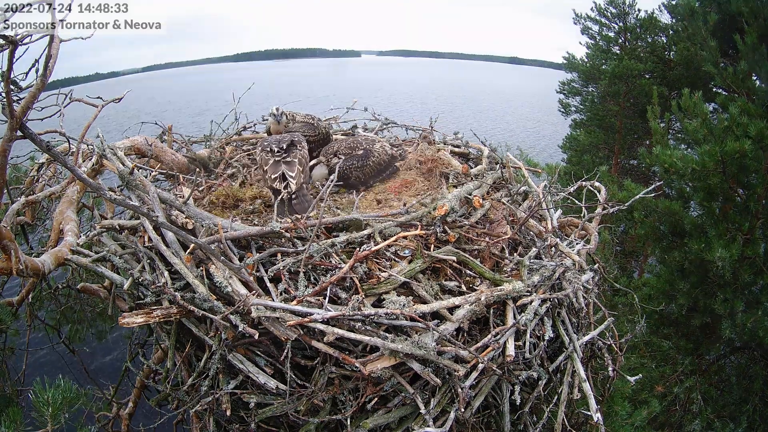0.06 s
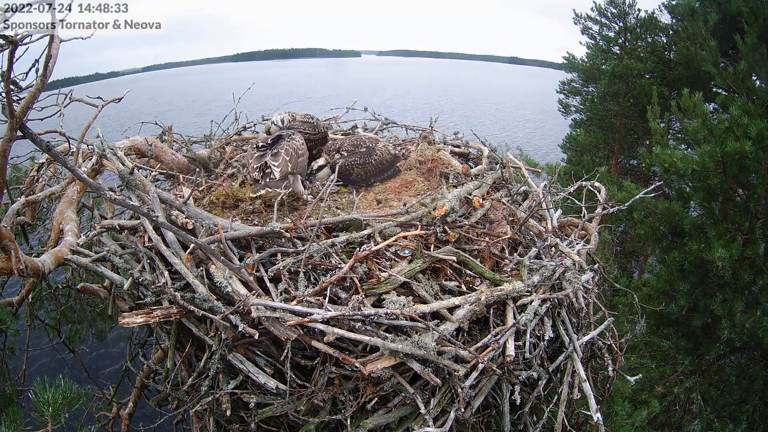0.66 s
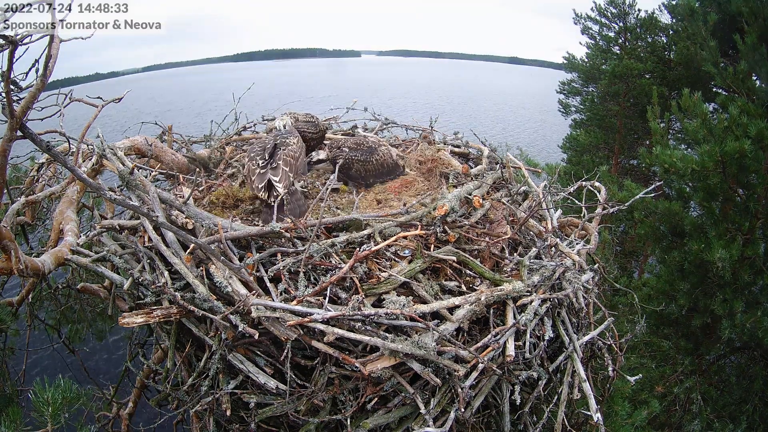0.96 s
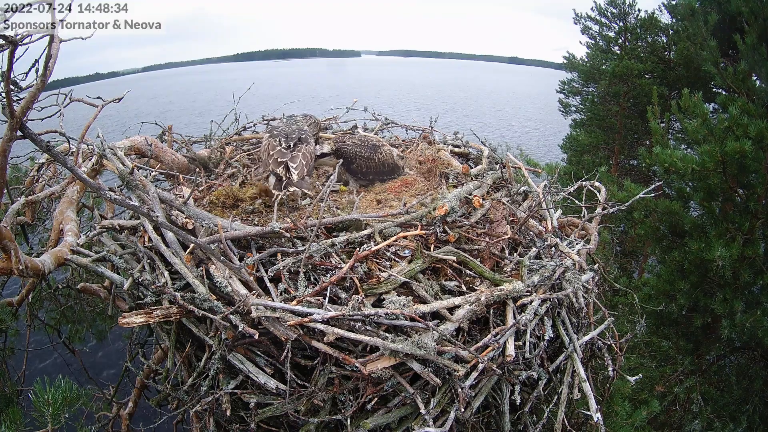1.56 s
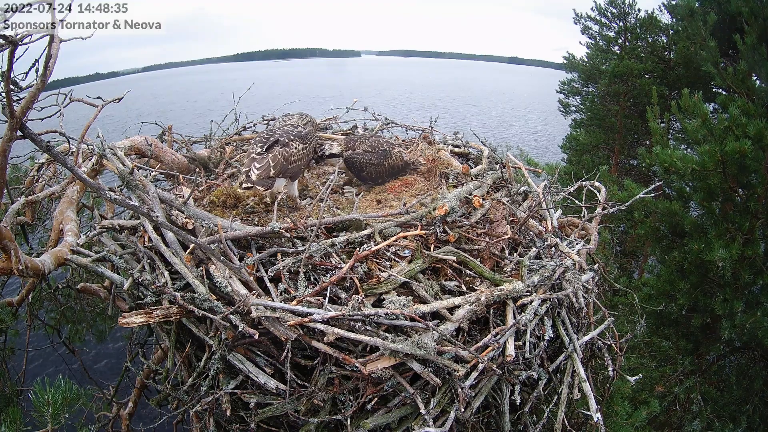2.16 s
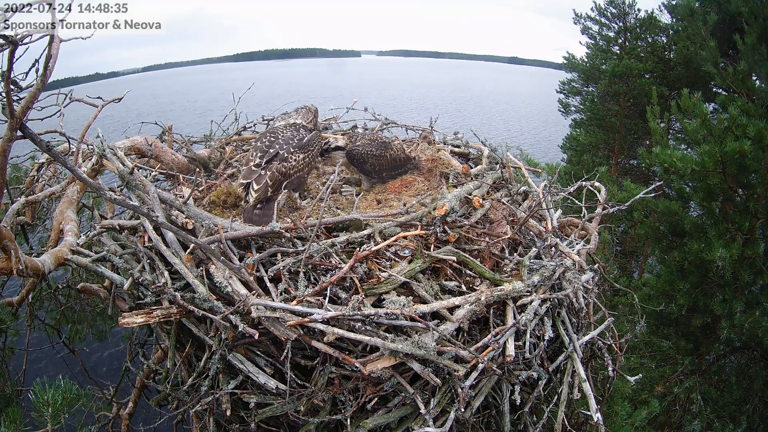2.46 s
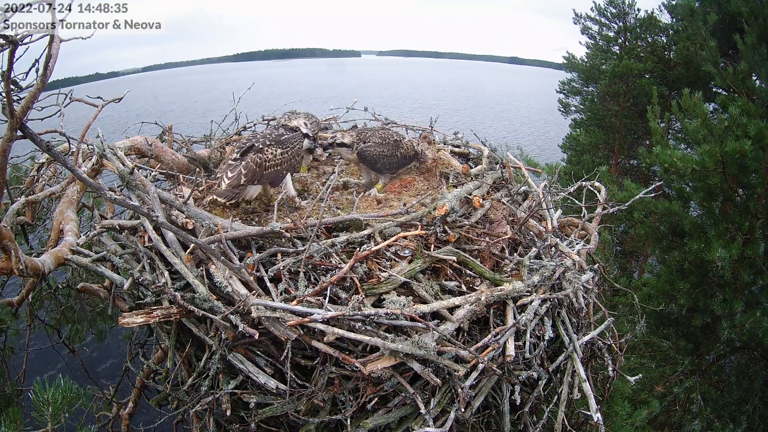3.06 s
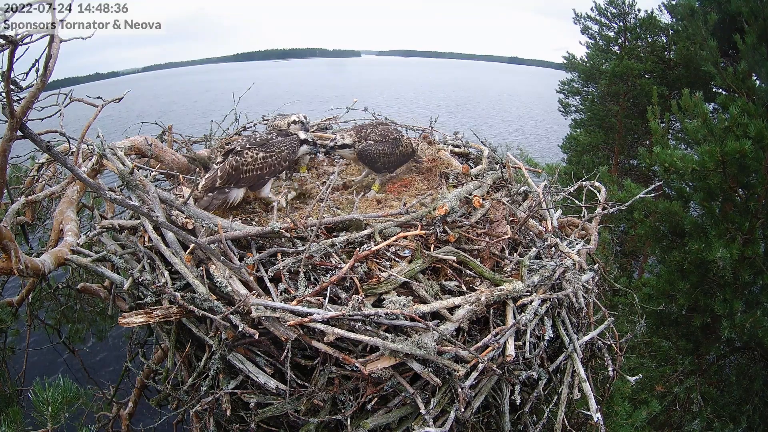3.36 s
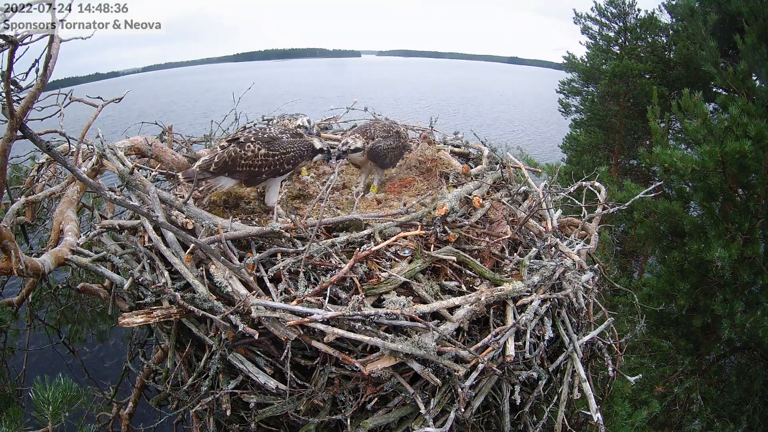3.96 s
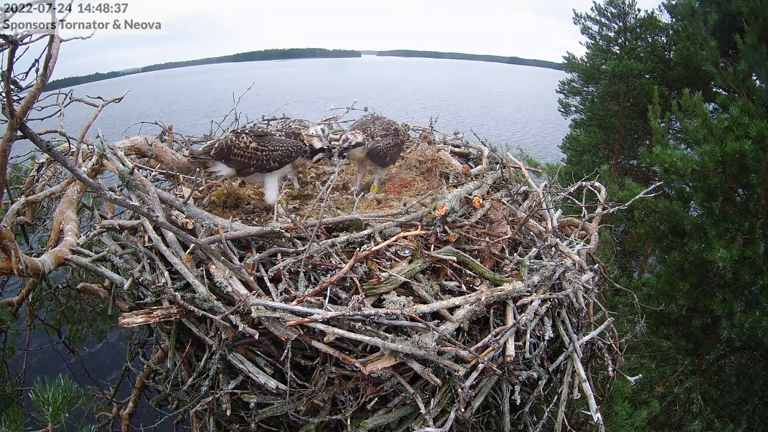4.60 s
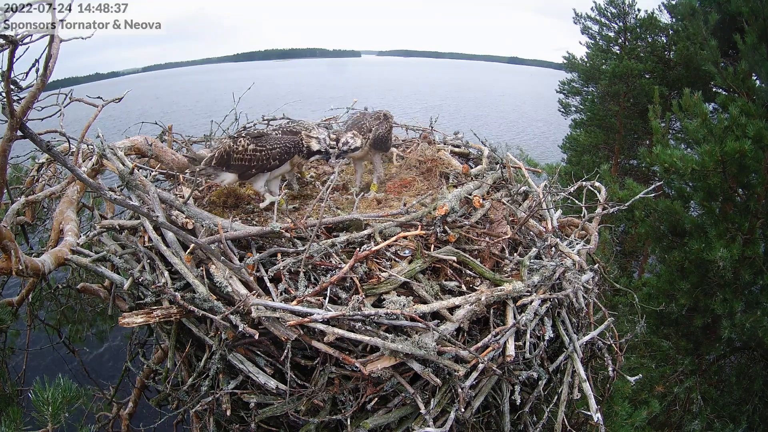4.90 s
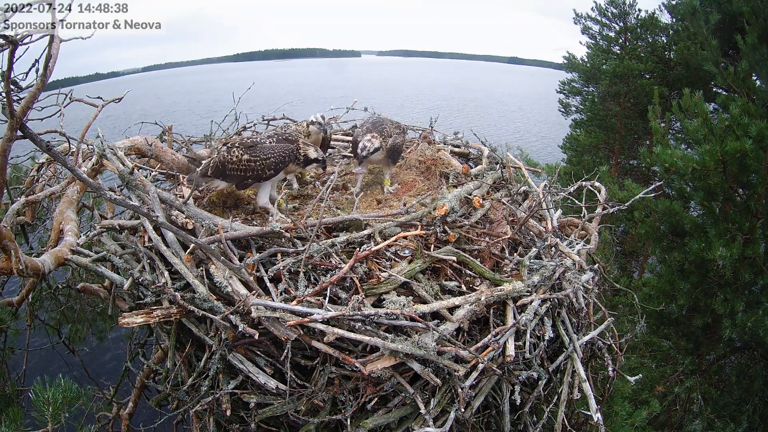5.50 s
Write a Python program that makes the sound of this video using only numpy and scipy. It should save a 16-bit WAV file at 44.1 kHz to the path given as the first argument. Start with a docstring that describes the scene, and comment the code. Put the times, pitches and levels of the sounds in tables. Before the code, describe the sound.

Two osprey chicks call from a stick nest above a lake, over low wind rumble on the microphone and a soft, steady hiss of distant trees and water. Thin, wavering high whistles open the first second. At about 1.2 seconds a tiny croak leads into a quiet, rising, raspy scream that ends in a falling yelp. A reedier whistle comes at 2.4 seconds, followed by stronger rasping screams at 2.7 and 3.5 seconds and a clear, quavering whistle at 3.9. At 4.6 seconds a short croak and throat clack start the loudest scream, which runs into a last whistle ending around 5.3. Gusts buffet the microphone at the start, around 2 seconds, near 3.9 and toward the end. Twigs snap faintly near 1.3 and 2.3 seconds and several times just after 4. Small waves lap and gurgle quietly throughout.

```python
"""Osprey chicks above a lake

Two chicks call from a stick nest. One gives wavering whistles that flip between a pure voice and a lower, reedy
one. The other croaks, climbs, breaks into a rasping scream with both sides of its voice box sounding, and ends
in a plunging yelp. Twigs snap under their feet, wind rumbles on the microphone while low lumps of buffeting
come and go, small waves lap and gurgle on the shore below, and trees and lake hiss far off."""
import sys
import numpy as np
from scipy import signal
from scipy.fft import rfft, irfft, next_fast_len
from scipy.io import wavfile
from scipy.ndimage import uniform_filter1d

SR = 44100
rng = np.random.default_rng(int(sys.argv[2]) if len(sys.argv) > 2 else 0)


def transcribe(u):
    """Save the signal u as a 16-bit wav file named by the first command-line argument.

    u: samples, shape (n,) or (channels, n), limited to [-1, 1]; the rate is SR.
    q: integer samples, one column per channel.
    """
    v = np.clip(np.atleast_2d(u).T, -1, 1)
    q = np.round(v * 32767).astype(np.int16)
    wavfile.write(sys.argv[1], SR, q)


N = 248724
TIME = np.arange(N) / SR

# one curve for each whistle, as sung in the pure voice: t/s, f/Hz, level/dB
WHISTLE_CURVES = [
    [(.055, 2180, -50), (.085, 2425, -41), (.12, 2427, -37.5), (.149, 2210, -45), (.2, 2390, -35),
     (.225, 2294, -42.5), (.25, 2055, -51)],
    [(.593, 2234, -46), (.618, 2297, -36.5), (.67, 2110, -52.5), (.74, 2037, -56.5), (.81, 2220, -49.5),
     (.866, 2280, -41.5), (.881, 1980, -57)],
    [(2.388, 2240, -43), (2.45, 2340, -42), (2.53, 2428, -41), (2.575, 2400, -42), (2.655, 2087, -47)],
    [(3.882, 2200, -40), (3.915, 2520, -30.5), (3.951, 2220, -38), (3.984, 2420, -36), (4.04, 2510, -34.5),
     (4.125, 2314, -34.5), (4.17, 2267, -32.5), (4.212, 2230, -36.5), (4.236, 1987, -42.5)],
    [(4.805, 2330, -54), (4.835, 2420, -39.5), (4.86, 2130, -45)],
    [(4.888, 2288, -33), (4.955, 2386, -33), (4.982, 2230, -31.5), (5.026, 2460, -34.5), (5.06, 2567, -32),
     (5.105, 2380, -37), (5.147, 2266, -38.5), (5.18, 2363, -38), (5.226, 2030, -39)],
]
# the octave overtone of each whistle in the pure voice: level/dB against the main tone
PURE_OCTAVES = [-13.5, -22, -30, -31, -31, -30]
# spells in the reedy voice: start/s, end/s
REEDY_SPELLS = [(2.37, 2.67), (3.87, 3.906), (3.951, 3.982), (4.211, 4.25), (4.87, 5.021), (5.206, 5.24)]
# how the throat picks out the reedy voice's octave: f/Hz, level/dB against the main tone
REEDY_THROAT = [(3150, -14), (3550, -2.5), (3700, -6), (3900, -17.5)]
def whistles(husk=0.094, reedy_ratio=.8, reedy_db=-0.5):
    """Begging whistles: pitch follows one smooth tension and drops a set step in the reedy voice."""
    out = np.zeros(N)
    for rows, pure_db in zip(WHISTLE_CURVES, PURE_OCTAVES):
        t, gate, (pure_hz, db) = contour(rows, attack=.014)
        reedy = uniform_filter1d(sum(1. * ((t > a) & (t < b)) for a, b in REEDY_SPELLS), size=160)
        hz = pure_hz * reedy_ratio ** reedy
        octave_db = (1 - reedy) * pure_db + reedy * read(REEDY_THROAT, 2 * hz)
        upper_db = -2 + 0.17 * octave_db  # the higher overtones follow the octave
        tone, _ = voice_box(t, hz, octave_db, jitter=.005, upper_db=upper_db, slope_db=2.5)
        level = gate * amp(db + reedy_db * reedy + 1.16 * wander(t, 42))
        add(out, t[0], np.sqrt(2) * level * tone * (1 + husk * wander(t, 500)))
    return out


# one curve for each scream, up to its final plunge: t/s, f/Hz, level/dB
SCREAM_CURVES = [
    [(1.19, 2483, -53), (1.202, 2646, -47.5), (1.254, 2900, -46), (1.272, 3202, -47), (1.32, 3530, -44),
     (1.332, 3730, -51), (1.414, 3874, -54.5), (1.44, 3640, -50), (1.498, 3750, -50), (1.52, 3410, -49.5),
     (1.656, 3584, -47.5), (1.69, 3370, -47)],
    [(2.675, 2634, -44), (2.683, 2620, -46), (2.693, 2946, -40), (2.735, 3290, -36), (2.751, 2980, -44),
     (2.867, 2880, -33.5), (2.875, 3073, -39), (2.965, 3282, -44.5), (3.015, 3560, -40), (3.047, 3511, -41),
     (3.055, 3600, -43), (3.142, 3470, -39.5)],
    [(3.465, 2400, -46), (3.481, 2540, -34), (3.493, 2708, -33.5), (3.501, 3225, -47), (3.509, 3347, -39.5),
     (3.547, 3400, -39.5), (3.597, 3360, -48), (3.639, 3730, -49), (3.705, 3605, -51.5),
     (3.733, 3920, -48.5), (3.833, 3730, -49.5), (3.863, 3440, -44.5)],
    [(4.597, 2654, -38), (4.613, 2786, -40.5), (4.673, 2826, -41), (4.703, 2950, -36.5),
     (4.745, 2840, -37.5), (4.765, 2897, -34.5), (4.851, 2860, -31.5), (4.863, 2956, -29),
     (4.877, 3210, -36), (4.893, 3220, -37), (4.911, 3450, -41), (4.955, 3240, -37)],
]
# how hard each scream is pushed: start of rasp/s, roughness/0-1, octave before the rasp/dB, yelp/dB
SCREAM_STRAIN = [(1.335, 0.39, -14, -38), (2.855, 0.3, -15.5, -35), (3.55, 0.65, -16, -28.5),
                 (4.858, 0.14, 3.5, -27.5)]
# tone colour of a rough voice's hiss: f/Hz, level/dB
RASP_SPECTRUM = [(600, -28), (1800, -5.5), (2800, 3.5), (3700, -10), (4800, 4.5), (5500, -10), (6400, -5.5),
                 (7500, -3.5), (8300, -26.5), (9200, -18), (10200, -27), (11000, -42), (12000, -27)]
def screams(break_s=0.058, bloom_s=0.026, plunge_s=0.019, yelp_hz=2544, end_hz=2230, waver_hz=28):
    """Pushed hard, a whistle breaks into wild flutter and hiss; it clears as the pitch plunges."""
    out, hiss, main_phase = np.zeros((3, N))
    for rows, (rasp_start, roughness, clean_db, yelp_db) in zip(SCREAM_CURVES, SCREAM_STRAIN):
        end = rows[-1][0]
        plunge = [(end + plunge_s / 2, yelp_hz, yelp_db), (end + plunge_s, end_hz, yelp_db - 8)]
        t, gate, (hz, db) = contour(list(rows) + plunge)
        broken = np.clip((t - rasp_start) / break_s, 0, 1)
        before_yelp = np.clip((end - t) / plunge_s + .5, 0, 1)
        rough = np.clip(0.048 + roughness * broken * before_yelp, 0, 1)
        octave_db = (1 - broken) * clean_db - 21 * broken
        octave_db -= np.maximum(db + 37, -5)  # the main tone swells alone
        octave_db -= 14 * np.clip(1 - (t - t[0]) / bloom_s, 0, 1)  # the octave fades in
        hz = hz * (1 + .004 * wander(t, waver_hz))
        jitter = .002 + .028 * rough
        tone, phase = voice_box(t, hz, octave_db, jitter, upper_db=-7.5 + 13 * rough, slope_db=-3)
        chaos = np.tanh(1.25 * rough)
        flutter = np.sqrt(1 - chaos ** 2) + chaos * wander(t, 430)
        level = gate * amp(db + 6.5 * rough + wander(t, waver_hz))
        add(out, t[0], np.sqrt(2) * level * tone * flutter)
        add(hiss, t[0], level * rough * (1 + abs(flutter)) / 2)  # the hiss surges with the tone
        add(main_phase, t[0], phase)
    out += second_voice(main_phase)
    return out + amp(-2 + 1.9 * wander(TIME, 250)) * hiss * noise(RASP_SPECTRUM)


# tone colour of the overtones above the octave: f/Hz, level/dB
OVERTONE_SPECTRUM = [(5000, -22), (5700, -8.5), (6600, -21), (7400, -19), (8500, -30.5), (10000, -43),
                     (11600, -58), (14000, -71.5)]
def voice_box(t, hz, octave_db, jitter, upper_db, slope_db):
    """A bird's voice box makes a slightly shaky tone with overtones; gives the sound and its phase."""
    phase = phase_of(hz * (1 + jitter * wander(t, 110)))
    upper = 0
    for k in range(3, 6):
        db = read(OVERTONE_SPECTRUM, k * hz) + slope_db * (k - 5.5) + 2 * wander(t, 40)
        upper += amp(db) * np.cos(k * phase)
    octave = amp(octave_db + wander(t, 49)) * np.cos(2 * phase)
    return np.cos(phase) + octave + amp(upper_db) * upper, phase


# the other side of the voice box joins in: start/s, end/s, starting f/Hz, turning f/Hz, level/dB
SECOND_VOICE_NOTES = [(1.266, 1.504, 2860, 3310, -57.5), (1.499, 1.688, 3860, 4210, -60),
                      (1.463, 1.61, 4710, 4980, -58), (2.741, 2.79, 3350, 3560, -48.5),
                      (2.868, 3.156, 3780, 4196, -48.5), (3.5, 3.673, 3810, 4180, -50.5),
                      (3.553, 3.837, 4580, 4810, -48), (4.876, 4.923, 4100, 4060, -45)]
def second_voice(main_phase, jitter=0.013, turn_share=0.7):
    """A weaker, shaky tone shares the airflow with the main one, so the two mix into extra tones."""
    out = np.zeros(N)
    for start, end, start_hz, turn_hz, db in SECOND_VOICE_NOTES:
        t, gate, (progress,) = contour([(start, 0), (end, 1)])
        hz = turn_hz + (start_hz - turn_hz) * (1 - progress / turn_share) ** 2
        main = np.interp(t, TIME, main_phase)
        own = phase_of(hz * (1 + jitter * wander(t, 110)))
        side_tones = amp(-10) * (np.cos(2 * own - main) + np.cos(2 * main - own))
        main_hz = np.clip(np.gradient(main) * SR / (2 * np.pi), 0, hz * 2)
        sum_gain = amp(14 + read(OVERTONE_SPECTRUM, hz + main_hz))
        sum_tones = sum_gain * (np.cos(own + main) + 0.4 * np.cos(2 * own))
        flutter = 1 + .45 * wander(t, 260)
        add(out, t[0], np.sqrt(2) * gate * amp(db) * flutter * (np.cos(own) + side_tones + sum_tones))
    return out


# low croaks and one short rising squeak: t/s, length/s, level/dB, starting f/Hz, ending f/Hz
CROAKS_AND_SQUEAK = [(1.150, 0.041, -49, 292, 714), (2.647, 0.058, -48, 330, 757),
                     (3.165, 0.033, -50, 652, 1660), (3.439, .041, -42, 328, 760),
                     (4.229, .032, -49, 301.6, 328), (4.559, 0.043, -40, 338.7, 453)]
# tone colour the throat gives them: f/Hz, level/dB
THROAT_SPECTRUM = [(300, 2.5), (550, 2), (800, -1), (1100, 5), (1500, -5), (2100, 2), (3300, -7.5),
                   (4300, -13.5), (5800, -6.5), (9000, -38)]
def croaks_and_squeak(jitter=0.029):
    """Low croaks and one short squeak: pulses that speed up as the throat tightens."""
    out = np.zeros(N)
    for s, length, db, start_hz, end_hz in CROAKS_AND_SQUEAK:
        t = np.arange(0, length, 1 / SR)
        hz = np.linspace(start_hz, end_hz, len(t)) * (1 + jitter * wander(t, 250))
        phase = phase_of(hz)
        pulses = sum(amp(read(THROAT_SPECTRUM, k * hz)) * np.cos(k * phase + rng.uniform(0, np.pi))
                     for k in range(1, 18))
        uneven = unit_level(pulses * (1 + 0.54 * wander(t, 630)))
        add(out, s, amp(db) * uneven * signal.windows.tukey(len(t), .4))
    return out


# clacks in the throat: t/s, relative level/dB, f/Hz
THROAT_CLACKS = [(1.154, -34, 1460), (4.554, -39.5, 1255), (4.582, -28.5, 1620)]
def clacks():
    """The throat clacks and rings very briefly as a call starts."""
    return hits(THROAT_CLACKS, rise_s=0.00049, ring_s=0.016, scatter_hz=450, gain_db=-1)


# twigs breaking: t/s, relative level/dB, f/Hz
TWIG_SNAPS = [(1.257, -43, 2980), (2.293, -41, 4310), (4.0905, -40, 4360), (4.122, -38.5, 3210),
              (4.243, -39, 4720), (4.324, -43, 3870)]
def twigs():
    """Each snap underfoot sets a cluster of sticks ringing for a moment."""
    return hits(TWIG_SNAPS, rise_s=.0015, ring_s=0.089, scatter_hz=900, gain_db=1.5)


# gusts above the steady breeze: t/s, half width/s, extra rumble/dB, extra buffeting/dB
WIND_GUSTS = [(.08, 0.19, 7.5, 9.5), (1.45, 0.36, 4, 4), (1.948, 0.11, 12, 16.5), (2.25, 0.1, 6, 13.5),
              (3.521, 0.3, 4, 5), (3.89, .06, 10, 10.5), (4.4, 0.14, 3, 6), (5.08, 0.22, 5.5, 7),
              (5.599, 0.22, 4.5, 10)]
# tone colours of the rumble and the buffeting: f/Hz, level/dB
RUMBLE_SPECTRUM = [(10, -23), (25, -1.5), (55, 3), (75, 0.5), (110, -10.5), (160, -23), (300, -76.5)]
BUFFET_SPECTRUM = [(50, -23.5), (100, -2), (160, -4), (220, -15), (320, -20.5), (600, -39.5), (1500, -61.5)]
def wind(rumble_db=-39.5, buffet_db=-50):
    """Gusts rumble on the microphone; low lumps of buffeting come and go with them, strongest around 2 s."""
    rumble_gust, buffet_gust = sum(np.outer(db, np.exp(-((TIME - s) / width) ** 2))
                                   for s, width, *db in WIND_GUSTS)
    eddies = amp(4 * np.tanh(wander(TIME, 16)))
    rumble = unit_level(amp(rumble_gust) * eddies * noise(RUMBLE_SPECTRUM))
    lumps_db = 6 * np.tanh(wander(TIME, 40))
    lumps = unit_level(amp(buffet_gust + lumps_db) * eddies * noise(BUFFET_SPECTRUM))
    return amp(rumble_db) * rumble + amp(buffet_db) * lumps


# gurgles at the shore, and one low thump: t/s, peak level/dB, f/Hz
GURGLES_AND_THUMP = [(.398, -44.5, 428), (.655, -43.5, 316), (1.312, -44.5, 1410), (1.468, -43.5, 778),
                     (1.895, -37.5, 274), (2.626, -35, 630), (2.747, -35.5, 952), (3.5, -40.5, 494),
                     (3.551, -42, 800), (5.056, -40, 480), (5.535, -35.5, 596)]
# tone colour of the washing water: f/Hz, level/dB
WASH_SPECTRUM = [(200, -15), (400, -6), (620, -4), (1000, 5), (1600, -3.5), (3000, -38), (8000, -35)]
def shore(bubble_count=330, wash_db=-60):
    """Small waves make a lumpy wash, little bubbles and gurgles; one low thump sounds among them."""
    lapping = amp(2 * wander(TIME, 5) + 3 * wander(TIME, 30))
    out = amp(wash_db) * unit_level(lapping * noise(WASH_SPECTRUM))
    for when, pitch, strength in rng.random((bubble_count, 3)):
        add(out, when * N / SR, amp(-56 + 9 * strength ** 2) * bubble(380 * 4.5 ** pitch, ring_s=.055))
    for s, db, hz in GURGLES_AND_THUMP:
        add(out, s, amp(db) * bubble(hz, ring_s=0.073))
    return out


def bubble(hz, ring_s, climb_per_s=4.35):
    """A short ring that climbs in pitch, as trapped air does when it nears the surface."""
    t = np.arange(SR // 10) / SR
    phase = phase_of(hz * (1 + climb_per_s * (t - .01) + 0.078 * wander(t, 150)))
    swell = 1 - np.exp(-t / 0.012)
    ring = np.sin(phase) * (1 + 0.46 * wander(t, 49)) * swell * fade(t, ring_s)
    return ring / abs(ring).max()


def nest_lining(level_db=-64, clicks_per_s=70):
    """The nest lining crackles faintly in tiny, random bursts of noise."""
    clicks = rng.standard_normal(N) * (rng.random(N) < clicks_per_s / SR)
    bursts = signal.lfilter([1], [1, -np.exp(-1 / (.004 * SR))], clicks)  # each click gets a short tail
    hiss = noise([(1500, -36.0), (3500, -0.5), (5500, -3.0), (9000, -29.5)])
    return amp(level_db) * unit_level(uniform_filter1d(bursts, size=60) * hiss)


# tone colour of the distant trees and lake: f/Hz, level/dB
FAR_SPECTRUM = [(100, 6), (300, -1), (600, 5.5), (1000, 2.5), (2000, 3.5), (4000, -1), (5500, -2),
                (7000, -9.5), (8500, -19.5), (10000, -35.5), (11500, -88), (12500, -43.5)]
def far_hiss(level_db=-53.5):
    """Trees and lake blend into a nearly steady hiss."""
    return amp(level_db + .5 * wander(TIME, 16)) * noise(FAR_SPECTRUM)


def branch_echo(sound, ring_s=0.16, echo_db=-27):
    """The branches scatter back a faint echo."""
    t = np.arange(SR // 2) / SR
    tail = rng.standard_normal(len(t)) * fade(t, ring_s) * (t > .004)
    return amp(echo_db) * signal.fftconvolve(sound, tail / np.linalg.norm(tail))[:N]


def hits(rows, rise_s, ring_s, scatter_hz, gain_db):
    """Each blow rings as a cluster of dying tones around one pitch."""
    out, t = np.zeros(N), np.arange(SR // 8) / SR
    for s, db, hz in rows:
        cluster = wander(t, scatter_hz) + 1j * wander(t, scatter_hz)
        tones = (cluster * np.exp(2j * np.pi * hz * t)).real
        ring = tones * (1 - np.exp(-t / rise_s)) * fade(t, ring_s)
        add(out, s, amp(db + gain_db) * ring / abs(ring).max())
    return out


def contour(rows, attack=0.0099, release=0.0037):
    """Gives one call's times, a gate that fades it in and out, and its smoothly joined columns."""
    s, *columns = np.transpose(rows)
    t = np.arange(s[0] - attack / 3, s[-1] + release / 2, 1 / SR)
    ramp = np.clip(np.minimum((t - t[0]) / attack, (t[-1] - t) / release), 0, 1)
    gate = np.sin(np.pi / 2 * ramp) ** 2
    return t, gate, [uniform_filter1d(np.interp(t, s, c), size=80) for c in columns]


def wander(t, hz):
    """A smooth random wobble of size about 1, with rates up to about hz."""
    size = next_fast_len(max(len(t), SR // 10))
    shape = 1 / (1 + (np.fft.rfftfreq(size, 1 / SR) / hz) ** 2)
    return unit_level(irfft(rfft(rng.standard_normal(size)) * shape, size))[:len(t)]


def noise(spectrum):
    """Noise of average power 1 with the given tone colour."""
    gains = amp(read(spectrum, np.fft.rfftfreq(N, 1 / SR)))
    return unit_level(irfft(rfft(rng.standard_normal(N)) * gains, N))


def read(spectrum, hz):
    """Looks up the level at hz, joining the points on a logarithmic frequency scale."""
    f, db = np.transpose(spectrum)
    return np.interp(np.log(hz + 1), np.log(f + 1), db)


def phase_of(hz):
    """The running angle of a tone whose pitch changes."""
    return 2 * np.pi * np.cumsum(hz) / SR


def fade(t, ring_s):
    """Dies away by 60 dB in ring_s seconds."""
    return np.exp(-np.log(1000) * t / ring_s)


def amp(db):
    """Turns decibels into a multiplier."""
    return 10 ** (np.asarray(db) / 20)


def unit_level(x):
    """Scales to an average power of 1."""
    return x / np.sqrt(np.mean(abs(x) ** 2) + 1e-20)


def add(mix, s, sound):
    """Mixes a sound in at s seconds."""
    part = mix[max(round(s * SR), 0):][:len(sound)]
    part += sound[:len(part)]


def scene():
    """Birds, nest, wind and water in one channel."""
    birds = whistles() + screams() + croaks_and_squeak() + clacks()
    return (birds + twigs() + branch_echo(birds) + wind() + shore() + nest_lining() + far_hiss())[None]


def record(dry, cutoff_hz=11900, fade_s=.004):
    """Softens both ends and takes off the highest treble."""
    ends = np.minimum(np.minimum(TIME, TIME[::-1]) / fade_s, 1)
    low_pass = signal.firwin(511, cutoff_hz, window=("kaiser", 9), fs=SR)
    return signal.oaconvolve(dry * ends, low_pass[None], "same")


dry = scene()
out = record(dry)
transcribe(out)
```